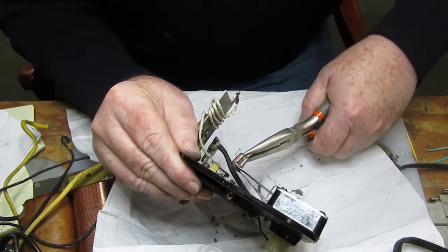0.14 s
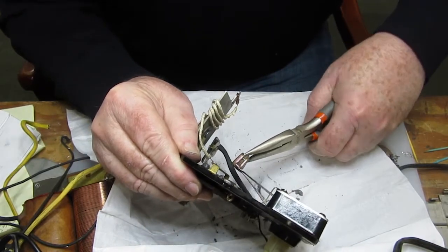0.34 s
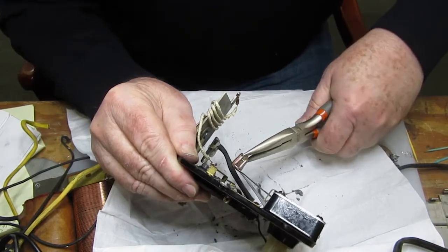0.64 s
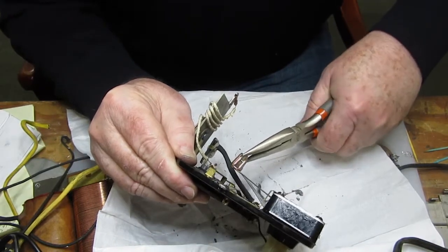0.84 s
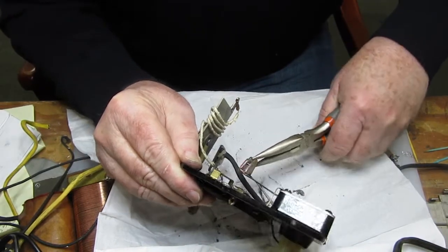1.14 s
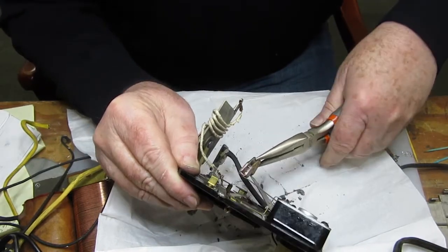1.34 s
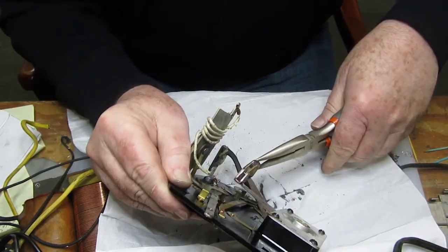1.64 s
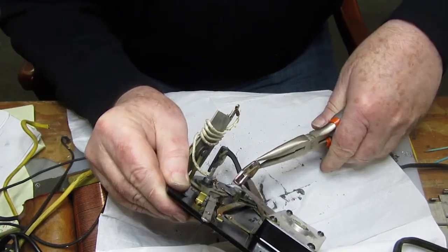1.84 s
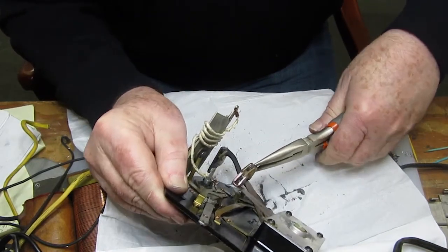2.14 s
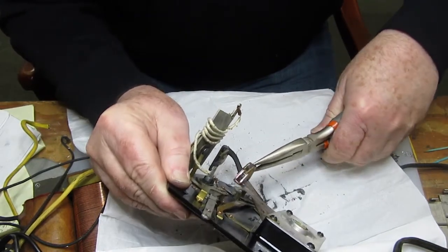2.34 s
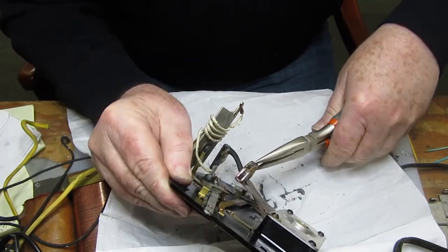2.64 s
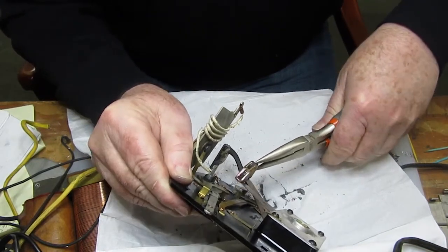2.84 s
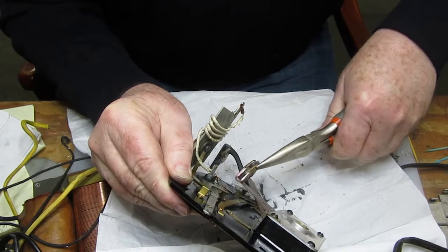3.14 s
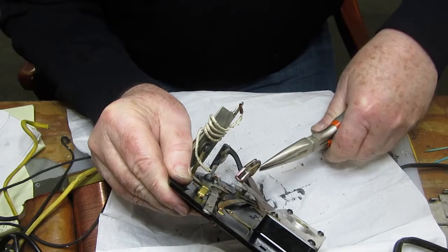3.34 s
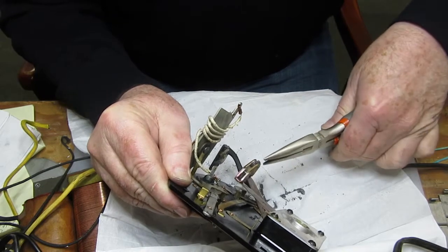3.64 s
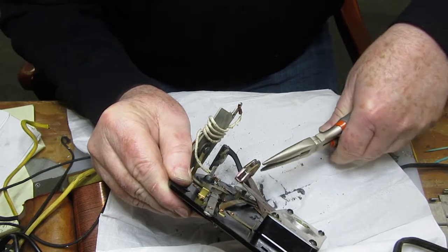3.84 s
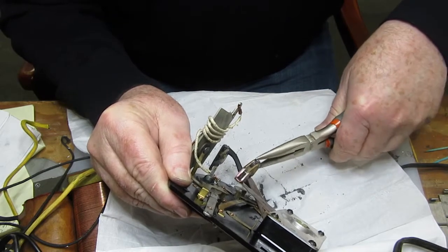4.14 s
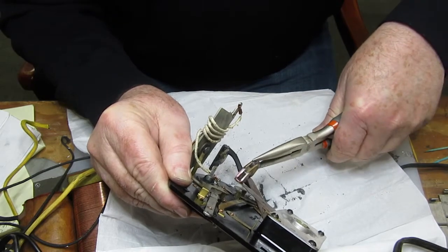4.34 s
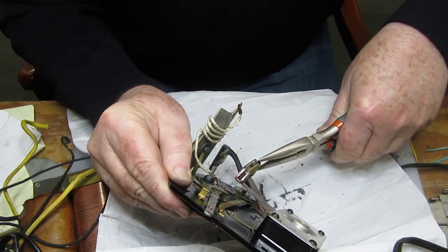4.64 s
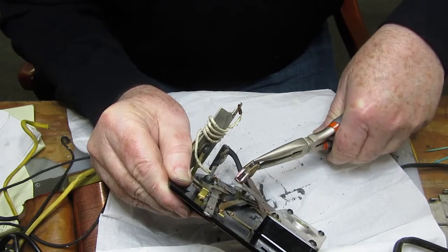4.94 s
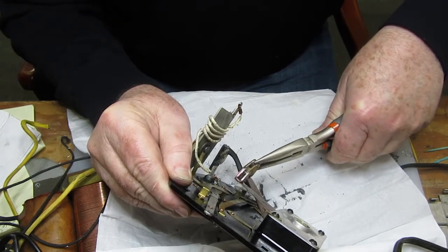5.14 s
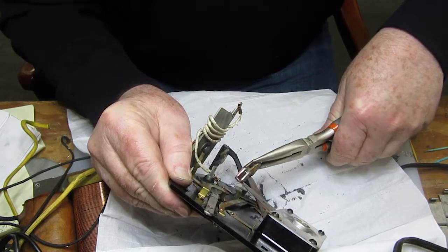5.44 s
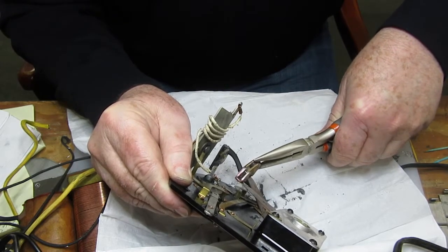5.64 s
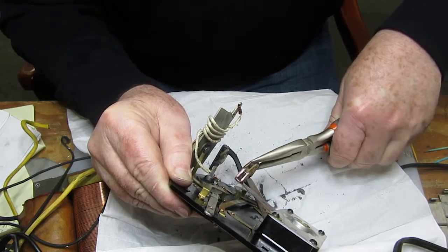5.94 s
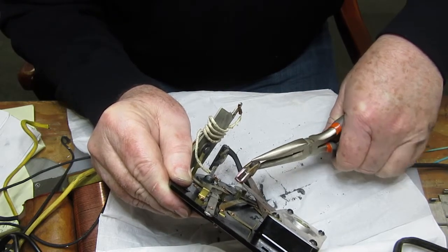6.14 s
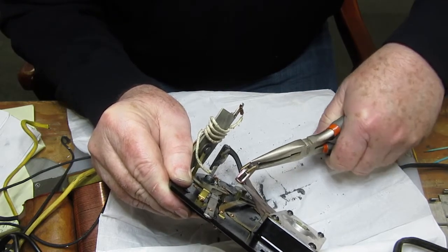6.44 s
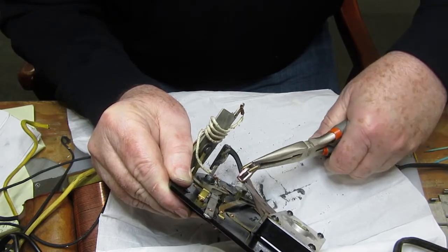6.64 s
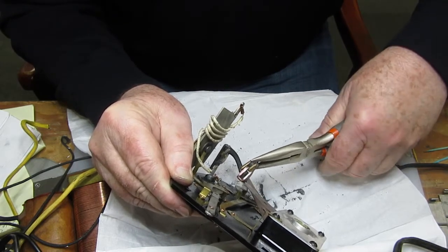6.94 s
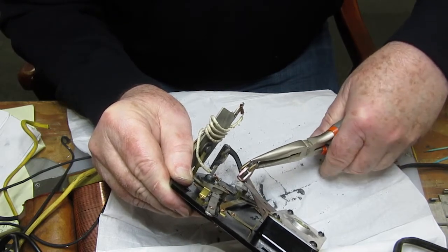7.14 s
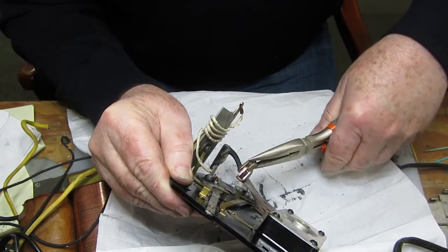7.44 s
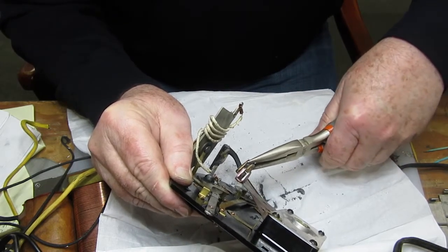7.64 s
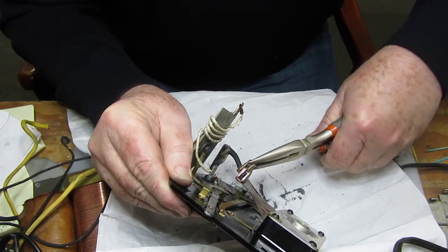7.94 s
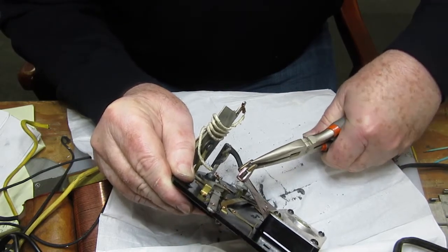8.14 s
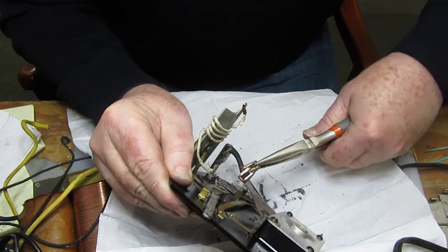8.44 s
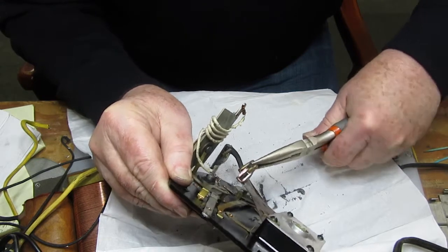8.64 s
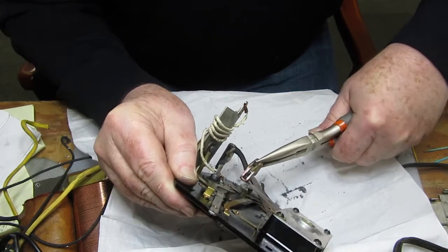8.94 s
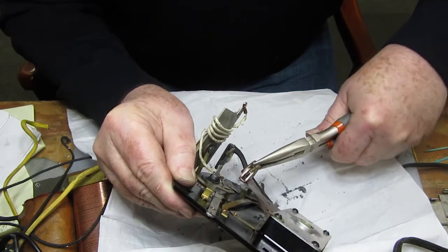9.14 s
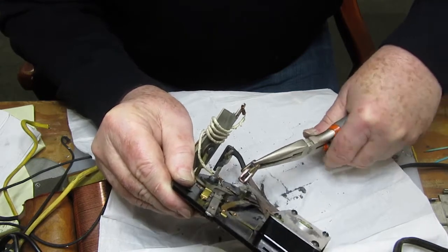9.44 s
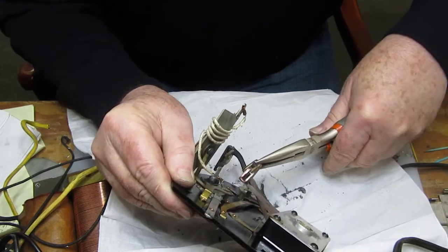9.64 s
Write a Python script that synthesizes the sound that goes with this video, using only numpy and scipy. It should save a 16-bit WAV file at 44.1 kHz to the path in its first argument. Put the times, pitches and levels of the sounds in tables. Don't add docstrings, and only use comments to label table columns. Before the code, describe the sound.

Close microphone in a small, dry room, with faint low machine hum and airy hiss throughout. At 0.1 s an extremely loud brittle snap clips, with a second break just after; the room noise briefly dips. Tiny jaw nips follow, then a stuttering run of woody bench knocks and paper scuffing at 1.05-1.15 s. From 1.55 to 2 s small crunchy metallic bites cluster, the strongest near 1.93. A dull tick comes at 2.67. Around 3.15 s strain gives way to a second big bright crack, with crumbling bites until 3.4. Sparse ticks lead to sharp bites at 5.18 and a hard crunch at 5.47. Lighter clicks and a bench knock near 6.5 follow. Firm snaps return at 8.4-8.8, with heavy knocks and dragging at 8.7-8.9, then a loud grinding bite at 9.4 and a last soft knock at 9.7.

```python
import sys
import numpy as np
from scipy import signal
from scipy.fft import rfft, irfft
from scipy.io import wavfile
from scipy.ndimage import uniform_filter1d

SR = 44100
rng = np.random.default_rng(int(sys.argv[2]) if len(sys.argv) > 2 else 0)


def generate_wav(sig):
    pcm = np.round(np.clip(np.atleast_2d(sig).T, -1, 1) * 32767).astype(np.int16)
    wavfile.write(sys.argv[1], SR, pcm)


def rack_gain(trim_db):
    fader = np.asarray(trim_db, float)
    return 10 ** (fader / 20)


N = 432180
T = np.arange(N) / SR

# start in seconds, jaw peak in dB, handles in dB re jaw, tips in dB re jaw,
# crumbling time in ms.
BITES = [(1.5662, -31, -10, -8, 8.1), (1.626, -27.5, -2, -2, 4.9), (1.6376, -25.5, -10, -5, 7),
         (1.6926, -35, -10, -10, 5.3), (1.7857, -30.5, -14, -4.5, 6), (1.8034, -30, -14, -6, 6),
         (1.8156, -37, -16, -11, 6), (1.9323, -19.5, -10, -3.5, 7.2), (1.9525, -32, -7, -8, 7.3),
         (1.959, -36, -24, 0, 5.4), (3.1836, -17.5, -14, -3.5, 4), (3.1895, -20, -13, -5, 3.6),
         (3.2106, -22, -17, -0.5, 4), (3.2636, -36, -6, 1, 4.5), (3.302, -21.5, -13, -3, 6.7),
         (3.3152, -20, -11.5, -3.5, 5), (3.3276, -24, -25, -9, 5), (3.341, -26.5, -13, -3, 4.7),
         (4.1855, -33, -10, -2.5, 5.1), (5.1599, -21.5, -13, -2.5, 7), (5.168, -27, -6, -7, 4.9),
         (5.1775, -27, -2.5, -10, 3), (5.182, -15.5, -11.5, -5, 4), (5.8455, -38.5, -21.5, -5, 6),
         (6.0487, -36.5, -14, -7, 4.6), (6.1379, -34, -13, -6, 5), (6.339, -25.5, -15, -5, 6.2),
         (7.735, -29, -17, -14, 4.4), (8.4052, -18, -14.5, -9, 2.6), (8.4696, -17.5, -12.5, -17.5, 3.1),
         (8.8034, -17.5, -15, -7.5, 3.4), (8.8127, -23, -9, -5.5, 3.3), (5.4676, -21, -14, -7, 5.3),
         (5.4728, -8, -14.5, -6.5, 5.9)]
# start in seconds, jaw peak in dB, handles in dB re jaw,
# tips in dB re jaw, swell time in ms.
GRINDS = [
    (1.671, -23, -10, -5.5, 7.2),
    (5.464, -36, 3, -4, 1.8),
    (5.479, -23, -6, -16, 4),
    (6.497, -32.5, -6.5, -11, 11),
    (8.397, -26, -11, -17, 4.6),
    (8.727, -16.5, -15, -11.5, 9.5),
    (9.4065, -10.5, -16, -7.5, 3.4),
    (9.4149, -13.5, -10.5, -6, 3.7),
]
# start in seconds, jaw peak in dB, tips in dB re jaw.
NIPS = [(.275, -57, 3), (3.229, -52, 0), (0.3394, -56.5, 9.5), (0.483, -48, -1), (0.523, -54, 4),
        (1.2008, -39, -7), (1.353, -41, -6), (2.025, -46, -5), (2.4284, -49, 1), (3.238, -48, 5),
        (3.3913, -45, 11), (4.289, -42, -11), (5.0242, -48, -8), (5.63, -47, -6), (7.391, -48, -7),
        (8.5313, -43, -20), (8.656, -39.5, -10), (8.6704, -50, -12), (8.749, -42, -16), (1.042, -48, -5),
        (1.1667, -52, 0), (1.293, -51, 0), (1.5239, -46, 1), (2.7945, -56, 0), (3.121, -50.5, 2),
        (3.4805, -59, 0), (3.499, -52, 4), (3.658, -58, 5.5), (6.1015, -48, -4), (6.1779, -52, -4),
        (6.7416, -50, 1), (6.8778, -49.5, 0), (6.9182, -52, 2), (7.6256, -50, -1), (8.18, -53.5, 3),
        (8.5056, -50, -8), (8.586, -48, -5), (8.6056, -45, -5), (8.8608, -34, -19), (8.871, -39, -18),
        (8.885, -39, -14), (1.9284, -37, -6), (9.386, -43, -8), (9.482, -47, -4), (7.813, -39, -13),
        (6.3455, -38, -8), (6.357, -44, -10), (6.375, -43, -6), (3.177, -34, 6)]
# start in seconds, peak in dB, pitch in Hz,
# treble in dB re peak, crumbling time in ms.
TICKS = [(1.742, -35, 1225, -9, 5.5), (1.981, -41.5, 2700, -2, 3.4), (2.666, -28.5, 1930, -19, 7.3),
         (3.213, -27, 1770, -8, 3.2), (3.3937, -37, 1860, 1, 11), (3.5148, -41, 1530, -8, 1.8),
         (4.345, -34, 1230, -10.5, 3.1), (4.5423, -42.5, 1450, -8, 2.8), (5.23, -33, 1813, -3, 4.5),
         (5.4093, -40.5, 1860, -11, 3.5), (5.457, -37, 1520, -22, 5.8), (5.9613, -41, 1270, -6, 3.5),
         (6.378, -39, 1560, -11, 5.3), (6.509, -32.5, 1530, -10, 4.4), (6.656, -38.5, 1530, -3, 1.6),
         (6.6884, -36.5, 1370, -6, 2.2), (7.813, -31, 1510, -14, 1.9), (8.804, -31, 2820, -10, 2),
         (8.812, -37, 2800, -14, 1.9)]
# start in seconds, peak in dB, treble in dB re peak, swell time in ms,
# lateness of the peak as an exponent.
SNAPS = [
    (.102, 6, -15.5, 2.83, 0.4),
    (0.1224, -0.5, -14, 4.5, 0.29),
    (3.149, -14.5, -10, 9.6, 1.04),
    (3.156, -10, 9, 1.3, 0.5),
    (3.1573, -2, -21, 2.95, 0.5),
    (3.159, -24, 8, 2.5, 0.41),
    (3.171, -27.5, -17, 11, 2),
]
# start in seconds, peak in dB, pitch in Hz,
# 60 dB decay in seconds, spread of their pitches from 0 to 1.
LOOSE_TABS = [(0.105, -22, 4090, 0.1, 0.02), (.125, -27, 1900, 0.067, .03), (.126, -41, 2470, 0.36, 0.15),
              (3.162, -33.5, 2340, 0.38, 0.1), (3.214, -28, 1800, 0.07, 0.04),
              (3.222, -45, 1900, 0.38, 0.2), (3.305, -33, 1700, 0.11, .15), (3.392, -35, 1863, 0.13, 0.02),
              (3.393, -38, 4250, 0.089, 0.06), (3.213, -40, 4050, 0.33, 0.04),
              (5.186, -38, 4020, 0.26, 0.01), (5.484, -37.5, 3880, 0.19, 0), (9.421, -32, 3985, 0.12, 0.03),
              (9.419, -43, 4710, .16, 0.03), (9.4075, -27, 4780, .012, 0.02),
              (9.4162, -28.5, 2720, .02, 0.03), (8.742, -41, 4050, 0.092, 0.03),
              (8.815, -36, 4800, .08, 0.03), (8.474, -46, 5300, .2, .004), (8.3975, -29, 2750, .014, 0.01),
              (8.4052, -28, 2760, .014, 0), (8.407, -32, 1350, 0.056, .05), (1.628, -39, 1900, .08, 0),
              (5.2305, -41, 5200, .015, 0), (5.457, -35, 2460, .012, .05), (8.734, -36, 1700, .08, .05),
              (5.185, -37.5, 1400, 0.09, 0.4), (1.958, -46, 6050, .06, 0.05), (3.395, -49, 9400, .12, .01),
              (6.376, -38, 1620, 0.07, .12), (6.504, -31, 1560, 0.088, 0.02), (3.186, -28, 3900, .05, 0.05),
              (3.186, -32, 7100, .04, 0.05)]
# start in seconds, peak in dB, 60 dB decay in seconds,
# favoured pitch in Hz.
KNOCKS = [(0.102, -23, 0.12, 400), (0.123, -25, 0.11, 300), (1.928, -32, 0.27, 108),
          (2.599, -41, 0.14, 110), (3.153, -27.5, 0.15, 300), (3.21, -34, .4, 260), (3.3, -39, 0.22, 260),
          (3.39, -37, .2, 260), (4.19, -38, .25, 260), (5.232, -33, .2, 300), (1.744, -40, .2, 165),
          (4.345, -40, 0.27, 260), (4.571, -36, 0.15, 260), (5.175, -34, 0.82, 110),
          (5.183, -27, 0.24, 400), (5.459, -27.5, 0.27, 304), (5.475, -26.5, 0.31, 403),
          (5.97, -35, 0.12, 110), (6.381, -46, 0.15, 260), (6.508, -29.5, 0.21, 260), (6.517, -32, .3, 300),
          (7.813, -32.5, 0.39, 110), (8.405, -33.5, 0.13, 260), (8.47, -26.5, 0.32, 111),
          (9.404, -27.5, 0.3, 247), (9.411, -21.5, 0.33, 255), (9.43, -28.5, 0.69, 256),
          (1.054, -23, .15, 165), (1.063, -28, .12, 300), (1.072, -19.5, 0.16, 700),
          (1.088, -19.5, 0.24, 261), (1.107, -21.5, 0.36, 260), (1.132, -25, .5, 110),
          (1.381, -30, .15, 200), (1.632, -26.5, 0.42, 112), (8.692, -33, .1, 303), (8.7, -23, 0.17, 260),
          (8.836, -20.5, .1, 300), (8.843, -19, 0.25, 109), (8.863, -17, .2, 200), (8.873, -15, 0.22, 263),
          (8.896, -19.5, 0.26, 264), (9.703, -29.5, .2, 161)]
# full pressure at seconds, hold in seconds, rumble in dB,
# dull rustle in dB, scrape in dB re rustle.
SLIDES = [(1.052, 0.061, -39, -44, -10), (1.144, 0.065, -48, -57, -6), (1.389, 0.0088, -42.5, -50, -2),
          (1.53, 0.05, -74, -53.5, -2.5), (1.63, 0.021, -37, -46.5, 0), (3.157, 0.058, -43.5, -47.5, -2),
          (4.194, 0.19, -52.5, -61.5, -15), (4.55, 0.038, -68, -58, -11), (5.416, .004, -66, -56, -14),
          (6.359, 0.021, -54, -52.5, 0), (6.508, 0.012, -49, -51.5, -11), (6.888, 0.032, -72, -53.5, -5),
          (7.646, 0.012, -61, -54.5, -5), (8.41, 0.11, -48.5, -54.5, -11), (8.696, 0.013, -32, -39.5, -8.5),
          (8.845, 0.025, -29.5, -39.5, -2.5), (8.926, 0.016, -40.5, -49, -16),
          (9.7, 0.0074, -47.5, -54, -4)]

# pitch in Hz, level in dB, 60 dB decay in seconds.
JAW_MODES = [(3743, 2, 0.014), (3877, 2.5, 0.016), (4024, 5, 0.013), (4160, -1, 0.0098),
             (3640, -20.5, 0.045), (4040, -26, 0.052)]
HANDLE_MODES = [(1250, -5, .012), (1390, -3, .016), (1540, -1, .017), (1900, -7, .022), (2400, -10, .008),
                (2750, -3, .01)]
TIP_MODES = [(5580, -9.5, 0.0216), (5910, -6.5, 0.019), (7130, 4, 0.011), (8150, -7, 0.0094),
             (8720, -8, 0.0093), (9850, 3, 0.0041), (9250, 0.5, 0.0065), (11550, -2, 0.0051),
             (9900, -23.5, 0.035), (12700, -14.5, 0.022)]
PART_MODES = [(332, -16, 0.0277), (491, -9, 0.019), (940, -17, 0.013), (1400, -11.5, 0.0068),
              (1860, -13, 0.059), (2200, -9, .01), (2410, 6.5, 0.014), (2654, 5, 0.011), (2990, 3, 0.0091),
              (3310, -4, 0.0048), (3780, 3, 0.0073), (4180, 6, 0.0089), (4670, 0.5, 0.0062)]
SHARD_MODES = [(5250, -5.5, 0.0055), (5870, -1.5, .007), (6660, -0.5, 0.007), (7300, -5.5, 0.0076),
               (8130, 0, .008), (9230, 1.5, 0.0064), (10180, -2, 0.0035), (11760, 0.5, 0.0039),
               (12600, -5, 0.0037), (13700, -6, .003)]
BENCH_MODES = [(111.5, -7.5, 0.45), (161, -6, 0.17), (268, 0.5, 0.085), (306, -5.5, 0.076),
               (406, -9.5, 0.067), (523, -7.5, 0.19), (700, -8, 0.052), (948, -32, 0.014)]
JAW_BAND_HZ = [3450, 4550]

# frequency in Hz, level in dB per Hz.
PAPER_SPECTRUM = [(290, -14), (500, 1), (615, -29), (800, -18), (1300, -3), (3600, -16.5), (4680, -54),
                  (7920, -120)]
AIR_SPECTRUM = [(32, -43), (55, -6), (145, -8.5), (402, -14.5), (1750, -21.5), (9380, -31.5),
                (14400, -41.5), (15800, -44.5)]
# pitch in Hz, width in Hz, level in dB re room tone.
WHINE = [(166.7, 9.5, -10), (261.8, 4, -14), (299, 2.7, -19), (403, 2.3, -14), (815, 7.8, -21.5),
         (908, 79, -9.5), (1227, 71, -11), (9500, 250, -27.5)]
# time in seconds, mains hum in dB, rumble in dB.
MACHINE_LOAD = [(0.0, -55, -56), (0.3, -60.5, -65), (0.6, -62.5, -56), (1.2, -55, -65), (1.6, -57.5, -51.5),
                (2.3, -56, -61), (3.0, -56.5, -55), (3.45, -58, -64), (3.62, -50.5, -59.5),
                (3.85, -58, -59), (4.8, -56.5, -53.5), (6.0, -55.5, -49), (6.75, -57, -52.5),
                (6.92, -46.5, -52.5), (7.15, -56.5, -51), (8.4, -55.5, -48), (9.2, -54, -57),
                (9.8, -55.5, -48.5)]
# start in seconds, depth in dB, recovery in seconds.
DUCKS = [
    (.13, 7, 0.84),
    (3.2, 4, 0.99),
]

HELD_S, HELD_HZ = 1.5, 2350
REGRIP_S, REGRIP_HZ, REGRIP_TIPS_HZ = 8.3, 4150, 9300
GRIP_T60_S = 0.023
CONTACT_MS = 0.42
NIP_HANDLES_DB, NIP_CRUMBLE_MS = -3, 5.5
SLIDE_RISE_DB_S, SLIDE_FALL_DB_S, PAPER_FALL_DB_S, HISS_DB = 695, 329, 504, -9.5
TONE_DB, DUCK_ATTACK_S, HUM_SWAY_DB = -52.5, 0.064, 1.5


def level(x, db):
    return x * rack_gain(db) / np.sqrt(np.mean(x ** 2))


def colour(shape):
    hz = np.arange(N // 2 + 1) * SR / N + 1e-3
    return level(irfft(rfft(rng.standard_normal(N)) * shape(hz), N), 0)


def slope(points):
    hz, db = np.transpose(points)
    return lambda f: rack_gain(np.interp(np.log(f), np.log(hz), db, -90, -90))


def peak(hz, width_hz):
    return lambda f: 1 / (1 + ((f - hz) / width_hz) ** 2)


def walk(rate):
    hold = int(SR / rate)
    steps = np.repeat(rng.standard_normal(N // 50)[:N // hold + 1], hold)
    return 1.316 * uniform_filter1d(uniform_filter1d(steps, hold), hold)[:N]


def decay(size, t60):
    return rack_gain(-60 * T[:size] / t60)


def ring(modes, scatter_db, detune, size, near_hz=None, soft_ms=0.025):
    hz, db, t60 = np.transpose(modes)[:, :, None]
    chance = rng.standard_normal((2, len(modes), 1))
    if near_hz:
        db = db - np.minimum(70 * np.abs(np.log(hz / near_hz)), 9)
    fade = rack_gain(db + scatter_db * chance[0]) * decay(size, np.maximum(t60, 0.002))
    tones = np.sin(2 * np.pi * hz * (1 + detune * chance[1]) * T[:size])
    soft_contact = (1 - np.exp(-T[:size] * 1000 / soft_ms)) ** 2
    return soft_contact * np.sum(fade * tones, axis=0)


def crumble(ms, density, late=0., first=1.02):
    chance = rng.random((2, 1200))
    age = T[:1200] * 1000 / np.clip(ms, 0.2, 20)
    if late:
        shape = np.sin(np.pi * np.minimum(age, 1) ** late) ** 2
    else:
        shape = np.exp(-age ** 1.6)
    cracks = (chance[0] < density) * (2 * chance[1] - 1) * shape
    cracks[np.argmax(shape)] = first
    spectrum = rfft(cracks, 2400)
    smooth = np.sqrt(uniform_filter1d(np.abs(spectrum) ** 2, size=25))
    even = irfft(spectrum / smooth)[:1200]
    return even * (shape > 0.003)


def tick(size):
    return np.diff(signal.windows.hann(size), 2)


def band(order, hz, kind, x):
    return signal.sosfilt(signal.butter(order, hz, kind, fs=SR, output="sos"), x)


def add(out, s, force, body, db):
    x = signal.fftconvolve(force, body)
    i = int(s * SR)
    x = x[:N - i]
    out[i:i + len(x)] += x * rack_gain(db) / np.max(np.abs(x))


def bite(out, s, db, handles_db, tips_db, ms, late):
    tight = s > REGRIP_S
    force = crumble(ms, 0.12, late, first=1.7)
    jaw = ring(JAW_MODES, 1.6, 0.0026, 2500, REGRIP_HZ if tight else None, CONTACT_MS)
    if tight:
        jaw = jaw * decay(2500, GRIP_T60_S)
    handles = ring(HANDLE_MODES, 2.0, 0.01, 2000, soft_ms=CONTACT_MS)
    tips = ring(TIP_MODES, 0.31, 0.0042, 3000, REGRIP_TIPS_HZ if tight else None, soft_ms=0.14)
    add(out, s, force, band(2, JAW_BAND_HZ, "bandpass", jaw), db)
    add(out, s, force, handles, db + handles_db + 3)
    add(out, s, force, tips, db + tips_db + 0.2)
    add(out, s, force, tick(9), db + tips_db - 1.5)


def pliers():
    out = np.zeros(N)
    for s, db, handles_db, tips_db, ms in BITES:
        bite(out, s, db, handles_db, tips_db, ms, late=0)
    for s, db, tips_db in NIPS:
        bite(out, s, db, NIP_HANDLES_DB, tips_db, NIP_CRUMBLE_MS, late=0)
    for s, db, handles_db, tips_db, ms in GRINDS:
        bite(out, s, db, handles_db, tips_db, 1.5 * ms, late=0.6)
    return out


def handle_ticks():
    out = np.zeros(N)
    for s, db, hz, top_db, ms in TICKS:
        force = crumble(ms, 0.21)
        modes = [(hz, 2.5, 0.013), (0.816 * hz, -2, 0.008), (1.395 * hz, -2, 0.007), (1.224 * hz, -3, 0.006)]
        add(out, s, force, ring(modes, 2.4, 0.011, 2000, soft_ms=CONTACT_MS), db)
        add(out, s, force, tick(13), db + top_db + 4)
    return out


def snaps():
    out = np.zeros(N)
    for s, db, top_db, ms, late in SNAPS:
        force = crumble(ms, 0.9, late, first=2.93)
        part = ring(PART_MODES, 0.4, 0.01, 2000, HELD_HZ if s > HELD_S else None)
        shards = ring(SHARD_MODES, 1.2, 0.012, 600, None if top_db > 0 else 5500)
        tabs = band(2, [1900, 3100], "bandpass", rng.standard_normal(16000))
        tabs = tabs * (decay(16000, 0.055) + rack_gain(-19.5) * decay(16000, 0.83))
        dust = band(1, [4000, 10000], "bandpass", rng.standard_normal(4000)) * decay(4000, 0.067)
        add(out, s, force, part, db)
        add(out, s, force, shards, db + top_db + 7)
        add(out, s, force, tick(5), db + 2 * top_db - 4)
        add(out, s, force, tabs, db - 30)
        add(out, s, force, dust, db - abs(top_db) - 16)
    return band(1, 700, "highpass", out)


def loose_tabs():
    out = np.zeros(N)
    for s, db, hz, t60, spread in LOOSE_TABS:
        modes = [(hz * (1 + k * spread), 0, t60) for k in (-1, -0.6, -0.15, 0.2, 0.7, 1)]
        add(out, s, crumble(3.3, 0.17), ring(modes, 1.0, 0.002, 16000, soft_ms=0.4), db)
    return out


def knocks():
    out = np.zeros(N)
    for s, db, t60, hz in KNOCKS:
        body = ring(BENCH_MODES, 1.5, 0.02, 9000, hz) * decay(9000, np.maximum(t60, 0.02))
        add(out, s, signal.windows.hann(int(SR / (hz + 350))), body, db)
    return out


def pressure():
    out = 0
    falls = np.array([SLIDE_FALL_DB_S] + 3 * [PAPER_FALL_DB_S])[:, None]
    for s, hold, rumble_db, rustle_db, scrape_db in SLIDES:
        shape_db = SLIDE_RISE_DB_S * np.minimum(T - s, 0) - falls * np.maximum(T - s - hold, 0)
        layers_db = np.array([rumble_db, rustle_db, rustle_db + scrape_db, rustle_db + HISS_DB])
        out = out + rack_gain(layers_db[:, None] + shape_db)
    return out


def dragging():
    slips = (rng.random(N) < 0.012) * rng.standard_normal(N)
    rumble = level(signal.fftconvolve(slips, ring(BENCH_MODES, 0, 0, 9000))[:N], 0)
    grit = 1 + uniform_filter1d(np.abs(slips), 40) / 0.053
    rumble_gain, *paper_gains = pressure()
    out = rumble_gain * rumble
    rustle_scrape_hiss = slope(PAPER_SPECTRUM), peak(4580, 880), peak(6800, 3700)
    for shape, gain in zip(rustle_scrape_hiss, paper_gains):
        out += gain * level(colour(shape) * grit, 0)
    return out


def room_air():
    air = colour(slope(AIR_SPECTRUM)) * rack_gain(0.28 * walk(24))
    for hz, width_hz, db in WHINE:
        air += rack_gain(db + 1.8 * walk(5)) * colour(peak(hz, width_hz))
    tone_db = TONE_DB + 1
    for s, depth_db, recovery_s in DUCKS:
        since = np.maximum(T - s, 0)
        tone_db = tone_db - depth_db * (1 - np.exp(-since / DUCK_ATTACK_S)) * np.exp(-(since / recovery_s) ** 2)
    return air * rack_gain(tone_db)


def unsteady_tone(hz, sway_hz, rate):
    return np.sqrt(2) * np.sin(2 * np.pi * np.cumsum(hz + sway_hz * walk(rate)) / SR)


def machine():
    s, *columns = np.transpose(MACHINE_LOAD)
    hum_db, rumble_db = (np.interp(T, s, c) for c in columns)
    hum = 1.14 * unsteady_tone(119.5, 1.571, 4.8) + 0.65 * colour(peak(117.6, 13))
    rumble = unsteady_tone(34.5, 1.503, 5.5) + 0.53 * colour(peak(33, 8))
    return hum * rack_gain(hum_db + HUM_SWAY_DB * walk(6.6)) + rumble * rack_gain(rumble_db + 1.7 * walk(6))


def room_tail(near):
    tail = rng.standard_normal(12000) * decay(12000, 0.17) * np.clip(T[:12000] / 0.0024, 0, 1)
    tail = signal.lfilter([1], [1, -0.8], tail)
    return signal.fftconvolve(near, tail / np.sqrt(np.sum(tail ** 2)))[:N]


def scene():
    near = pliers() + handle_ticks() + snaps() + loose_tabs()
    close = near + rack_gain(-23) * room_tail(near) + knocks() + dragging()
    return (band(3, 80, "highpass", close) + room_air() + machine())[None]


def low_pass(x):
    return signal.sosfilt(signal.butter(12, 15980, fs=SR, output="sos"), x)


def record(dry):
    top_cut = signal.ellip(6, 0.3, 40, 15000, fs=SR, output="sos")
    mix = signal.sosfilt(top_cut, np.clip(dry, -1, 1))
    return low_pass(np.clip(mix, -1, 1))


dry = scene()
out = record(dry)
generate_wav(out)
```